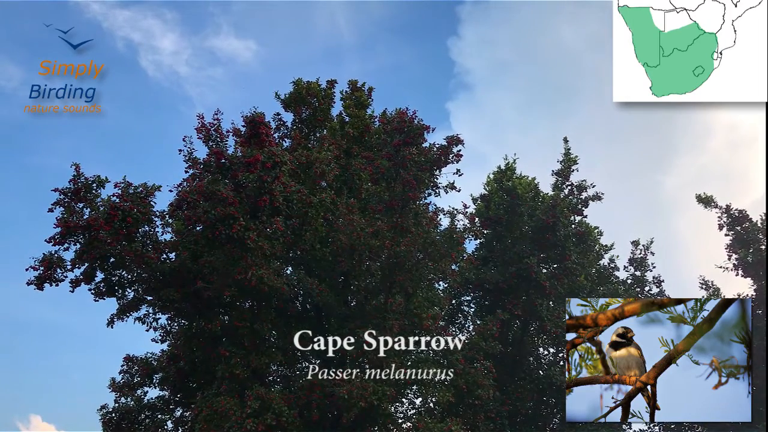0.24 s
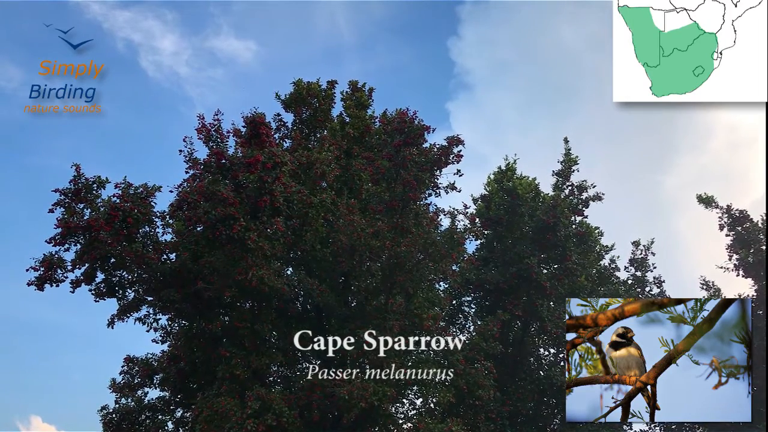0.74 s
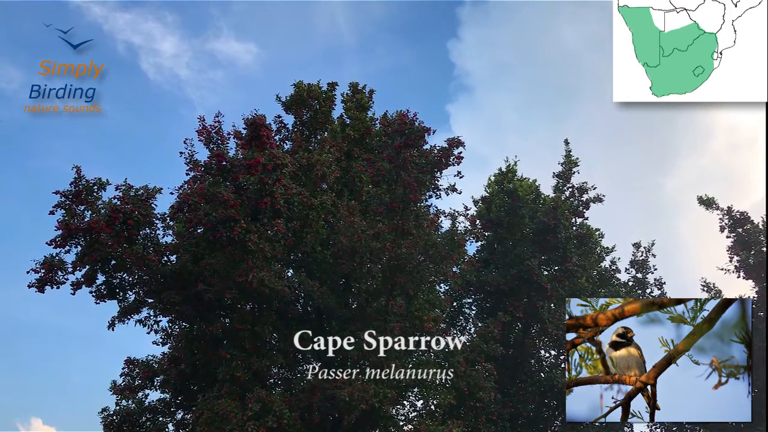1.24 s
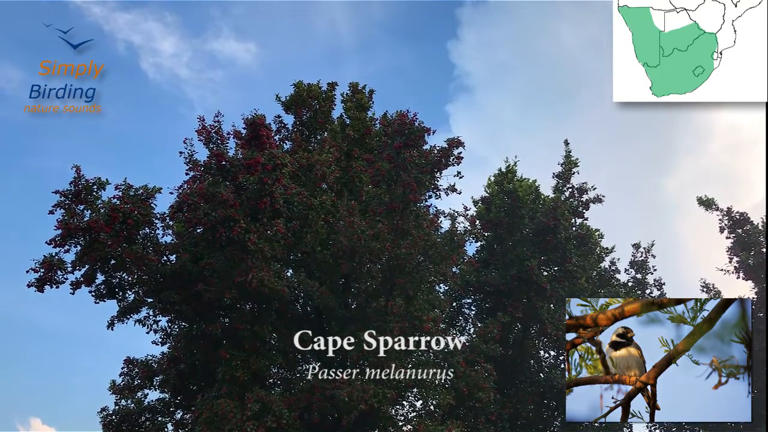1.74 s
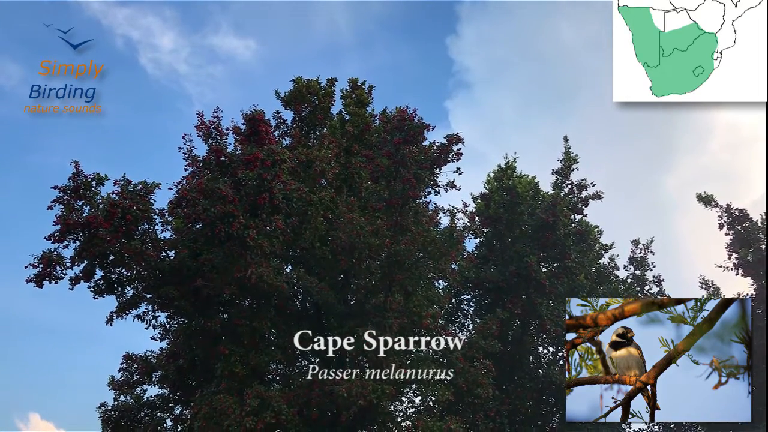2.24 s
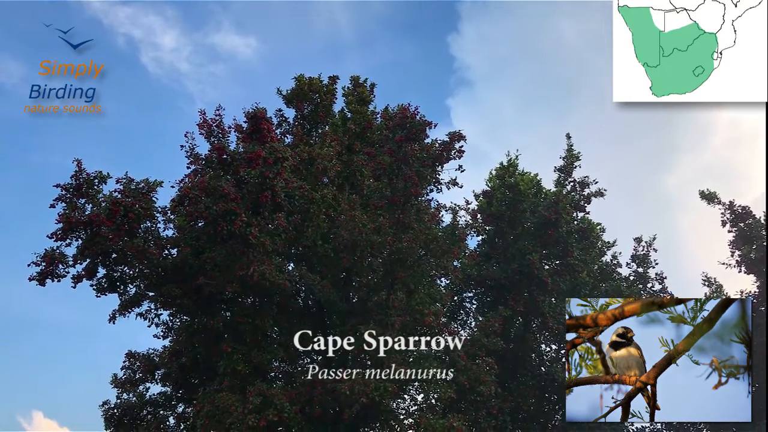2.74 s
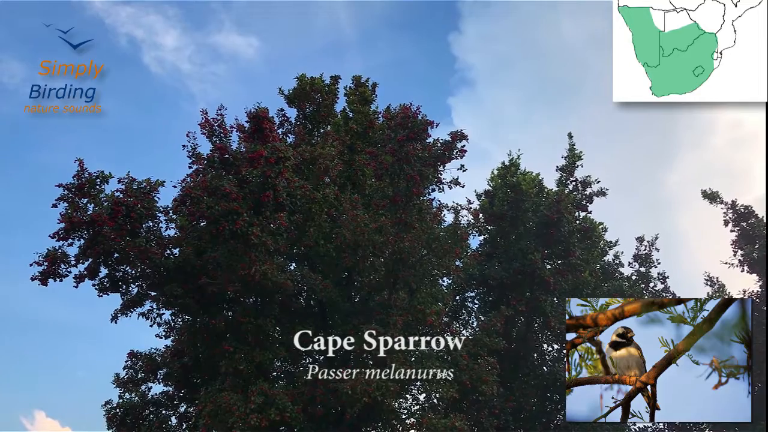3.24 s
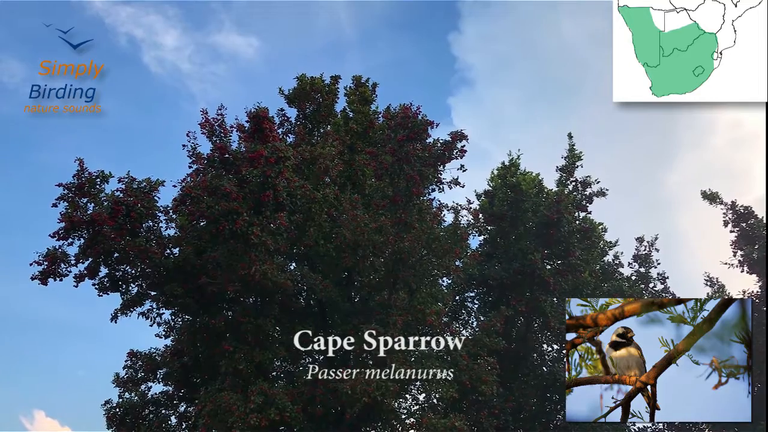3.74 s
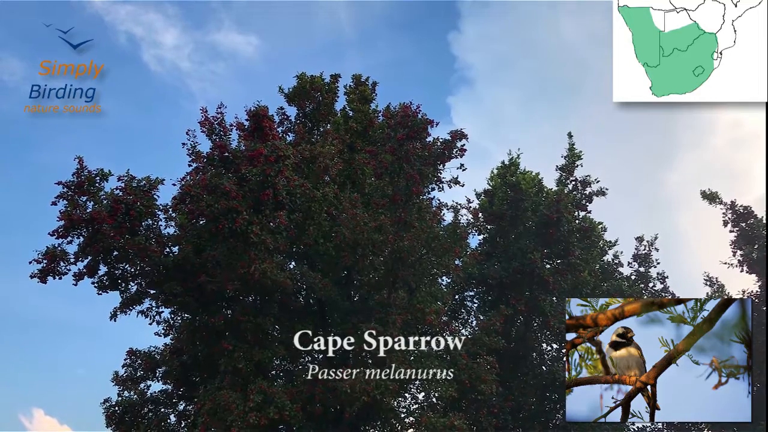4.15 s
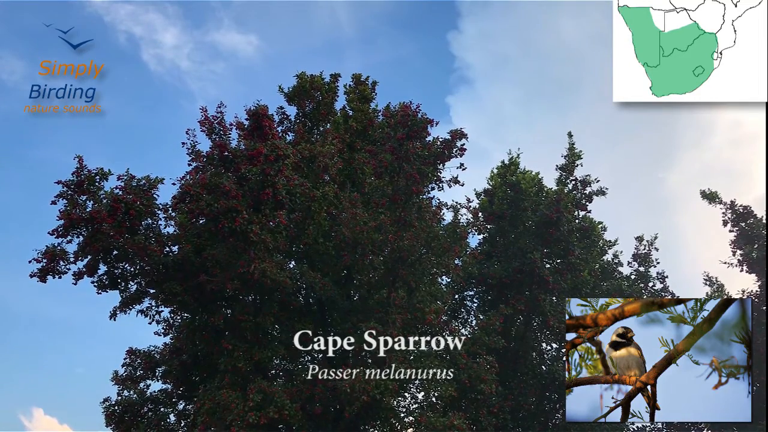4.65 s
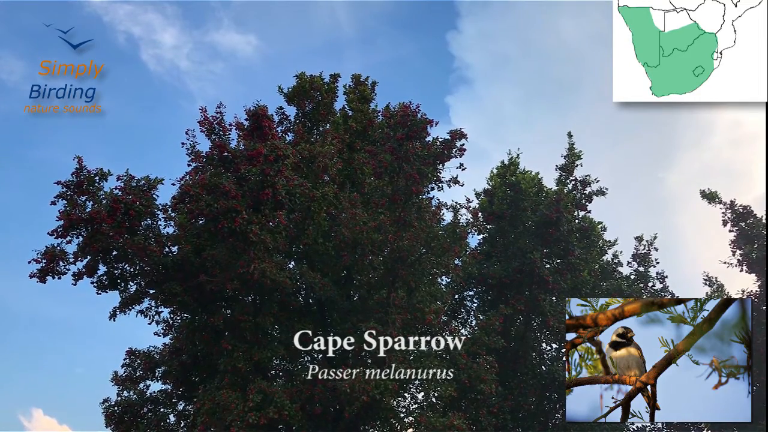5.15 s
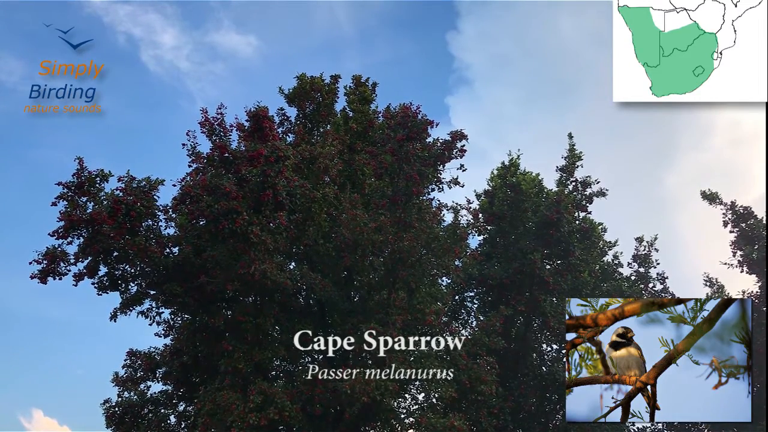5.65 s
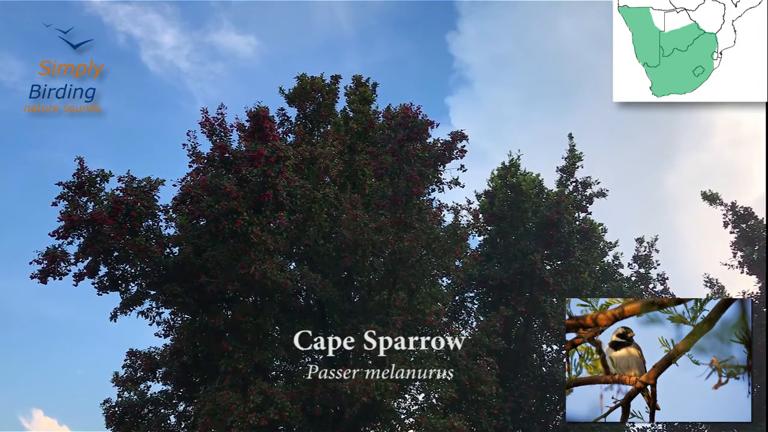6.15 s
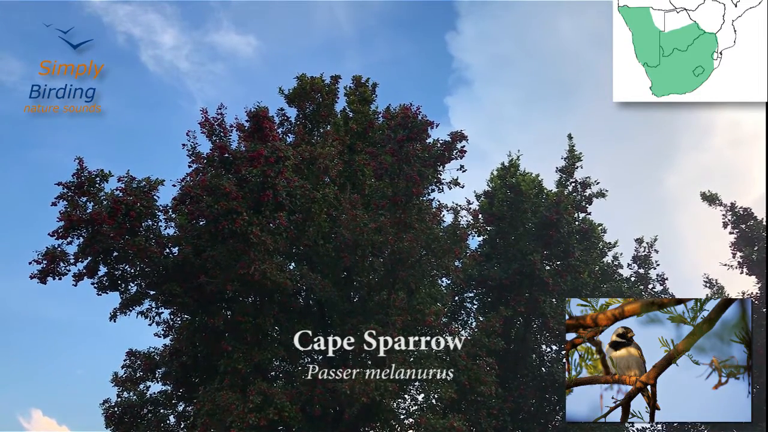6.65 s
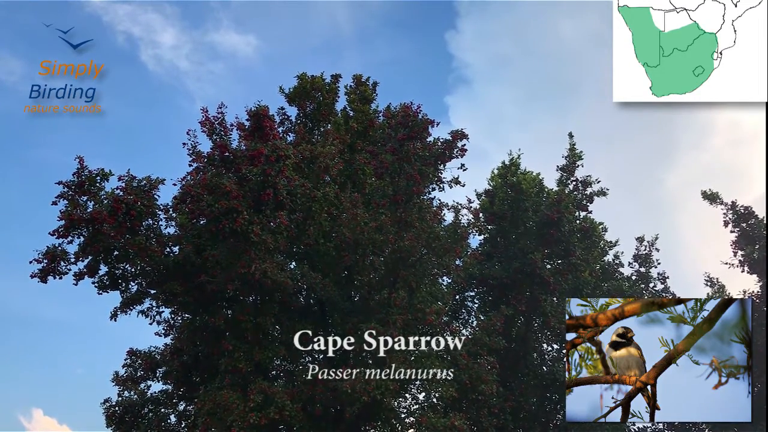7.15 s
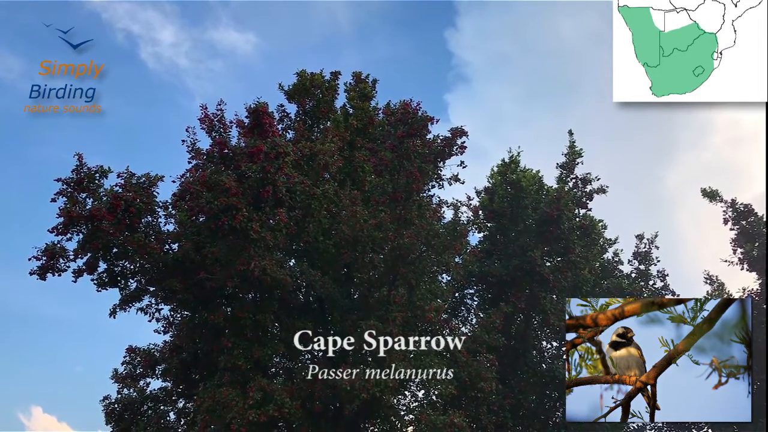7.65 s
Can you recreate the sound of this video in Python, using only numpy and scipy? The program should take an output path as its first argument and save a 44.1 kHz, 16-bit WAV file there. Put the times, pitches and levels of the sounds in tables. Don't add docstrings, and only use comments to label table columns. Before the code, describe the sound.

A small sparrow in a garden tree gives sharp chirps about once a second, wavy and downward-sliding in turn, over faint distant birdsong.

```python
import sys
import numpy as np
from scipy import signal
from scipy.fft import rfft, irfft
from scipy.io import wavfile
from scipy.ndimage import uniform_filter1d

SR = 44100
rng = np.random.default_rng(int(sys.argv[2]) if len(sys.argv) > 2 else 0)


def level_to_linear(level):
    exponent = np.asarray(level, float) / 20
    return 10 ** exponent


def to_wav(s):
    ch = np.atleast_2d(s).T
    pcm = np.round(np.clip(ch, -1, 1) * 32767)
    wavfile.write(sys.argv[1], SR, pcm.astype(np.int16))


N = 348390

# frequency_hz, density_db (per Hz)
HUSH_SPECTRUM = [(20, -11.5), (60, -35.5), (200, -28.5), (400, -21), (700, -13.5), (1000, -6.5),
                 (2000, 1.5), (3200, -3.5), (4000, -6.5), (5000, -10.5), (6300, -9.5), (8000, -14.5),
                 (12000, -16), (16000, -18)]
HUSH_DB = -60.5

# start_s, length_s, first_pitch_hz, last_pitch_hz, level_db
DOVES = [
    (0.239, .08, 423, 428, -84),
    (1.78, .5, 1238, 1066, -78),
    (2.356, .2, 590, 631, -84.5),
    (4.709, .11, 426, 428, -90),
    (5.367, .13, 612, 729.2, -81.5),
    (6.002, .375, 663.6, 773, -75),
    (7.026, .095, 520, 540, -83),
]
# start_s, length_s, first_pitch_hz, last_pitch_hz, level_db
SCOOPS = [
    (1.44, .16, 2150, 2602, -56),
    (1.66, .195, 1750, 2180, -57),
    (1.75, .11, 2100, 1900, -62),
    (2.215, .075, 2600, 3290, -50),
    (2.42, .18, 1550, 2225, -57),
    (2.63, .42, 2200, 2080, -67),
]
# start_s, length_s, first_pitch_hz, last_pitch_hz, level_db
GLIDES = [
    (.507, .043, 5200, 3600, -70),
    (1.734, 0.043, 3850, 3290, -66),
    (2.732, 0.15, 3230, 3560, -67),
    (5.1, 0.031, 2124, 2590, -50.5),
    (6.914, .046, 3800, 3450, -65),
]
# start_s, length_s, first_pitch_hz, last_pitch_hz, level_db
RISER = (2.655, .24, 3500, 5850, -69)
# start_s, length_s, pitch_hz, level_db
PEEPS = [
    (.001, .18, 2375, -69.5),
    (0.224, .095, 3084, -64.5),
    (0.371, .142, 3323, -68.5),
    (0.442, .042, 3600, -71),
    (1.018, .055, 7380, -68.5),
    (1.367, .066, 2163, -64),
    (3.299, .4, 2063, -70.5),
    (5.688, .05, 3370, -66.5),
    (6.54, .11, 2083, -67.5),
    (6.558, .06, 3364, -63),
]
# start_s, length_s, first_pitch_hz, last_pitch_hz, level_db
HOARSE_CALLS = [
    (.001, .073, 4000, 2900, -65.5),
    (.245, .03, 2350, 1750, -58),
    (.286, .025, 2310, 1750, -60),
    (3.304, .153, 2518, 2306, -64.5),
    (4.03, .21, 6050, 5900, -71),
    (4.05, .18, 5250, 5080, -72),
    (4.375, .07, 3700, 3200, -69),
    (4.86, .056, 3700, 3500, -69),
    (5.17, .05, 5100, 5120, -55),
    (7.117, .14, 3250, 3350, -67),
]
# pair_start_s, lower_pitch_hz, level_db, rasp_db, pitch_waver_share
CHIRRUPS = [
    (1.385, 4400, -62, -65, .007),
    (3.08, 4620, -48, -62, .016),
    (3.65, 4620, -57, -63, .018),
    (7.03, 4600, -71, -68, .03),
]
# start_s, length_s, first_pitch_hz, last_pitch_hz, level_db
NEIGHBOUR_CALLS = [
    (7.405, .055, 3330, 2800, -60),
    (7.5, .08, 3020, 2430, -61),
    (7.685, .085, 3020, 2430, -62),
]
# multiple, level_db
NEIGHBOUR_PARTIALS = [(2, 2), (3, -2), (4, -16.5), (5, -15), (6, -21.5)]

# start_s, pitch_factor, stretch_factor, level_db, swell_db (towards the end)
WAVY_CALLS = [
    (0.745, 1, 1.02, 0.2, 0.5),
    (2.9853, 1.007, 0.99, 0.3, 1),
    (5.1016, 1.001, .99, 0.73, 0.16),
    (7.267, 1.012, 1.017, 2.34, -2),
]
# start_s, pitch_factor, stretch_factor, level_db, swell_db (towards the end)
SLIDE_CALLS = [
    (1.8665, 1.014, 0.99, -0.11, 0.15),
    (3.8385, 1.011, 1, 0.22, 0.55),
    (5.9769, 1.015, 0.99, -0.32, -0.35),
    (7.8503, 1.016, 0.94, -0.085, -0.059),
]
# time_s (after the onset), pitch_hz, effort_db
ARCH = [(-.005, 3077, -50), (0, 4020, -36), (.004, 4452, -21), (.012, 4760, -25.5), (.028, 4910, -32),
        (.036, 4740, -27.5), (.045, 3804, -17), (.051, 2952, -32)]
HUMP = [(.06, 3320, -19.5), (.072, 3957, -25), (.085, 4139, -24), (.096, 4050, -30), (.109, 3533, -31)]
TROUGH = [(.116, 3100, -21), (.126, 2433, -19), (.135, 2216, -23), (.144, 2392, -20), (.151, 2850, -25.5),
          (.162, 3150, -40.5), (.167, 3050, -56)]
UNDERTONE = [(.003, 3800, -77.5), (.008, 3756, -44.5), (.016, 3617, -33), (.038, 3335, -28),
             (.042, 3500, -42.5), (.047, 3965, -34.5), (.052, 4170, -26.5), (.055, 4140, -34.5),
             (0.058, 4200, -73.5)]
DIP = [(-.005, 4743, -57), (-.001, 4470, -37.5), (.004, 4000, -25.5), (.008, 2810, -45)]
FLICK = [(.010, 4153, -25), (.014, 6452, -46.5), (.016, 5283, -31.5), (.018, 5040, -24)]
SLIDE = [(.023, 5030, -35), (.03, 4762, -32.5), (.04, 4365, -19.5), (.056, 3800, -18), (.07, 3315, -14),
         (.092, 2530, -18), (.108, 2060, -23.5), (.121, 1814, -38), (.125, 1888, -48)]
# multiple, level_db
OVERTONES = [(2, -35), (3, -42), (4, -52), (5, -55.5)]
# frequency_hz, gain_db
BEAK = [(1500, -19.5), (2200, -7.5), (3500, -6.5), (4450, 13), (4800, 11), (5400, -4), (6200, 3.5),
        (7200, -4.5), (8300, -2), (9300, -3), (11300, 5), (13000, -6), (16000, -7)]
# t60_s, level_db
LEAVES, WALLS = (0.3, -20), (0.62, -22.5)

# start_s, length_s, level_db
KNOCKS = [
    (2.2215, 0.0014, -63),
    (6.89, 0.018, -79),
]
# time_s (after the onset), pitch_hz, effort_db
MATE = [(.001, 4200, -55.5), (.008, 4436, -41), (.02, 4440, -36), (0.032, 4480, -25.5), (.045, 4380, -31.5),
        (.055, 4480, -37), (.065, 4494, -64)]
MATE_START_S = 5.16


def evened(x):
    return x / np.sqrt(np.mean(abs(x) ** 2) + 1e-20)


def read(points, hz):
    f, value = np.transpose(points)
    return np.interp(np.log(hz + 1), np.log(f + 1), value)


def add(mix, start_s, sound):
    part = mix[round(start_s * SR):][:len(sound)]
    part += sound[:len(part)]


def drift(count, span_s):
    size = max(int(span_s * SR), 2)
    noise = uniform_filter1d(rng.standard_normal(count), size)
    return evened(uniform_filter1d(noise, size))


def scatter(x, t60_s, level_db):
    t = np.arange(SR) / SR
    echoes = rng.choice([-1., 1.], SR) * (rng.random(SR) < .08)
    taps = echoes * level_to_linear(-60 * t / t60_s) * (1 - np.exp(-t / 0.0014))
    return level_to_linear(level_db) * signal.fftconvolve(x, taps / np.linalg.norm(taps))


def hush():
    frames, hz = N // 256 + 5, np.fft.rfftfreq(1024, 1 / SR)
    a, b, patches = rng.standard_normal((frames, 513, 3)).T
    patches = uniform_filter1d(patches, size=10, axis=0)
    patches = evened(uniform_filter1d(patches, size=20, axis=1))
    chatter = np.exp(-np.log(hz / 3200 + 1e-9) ** 2 / 1.6)[:, None]
    level_db = read(HUSH_SPECTRUM, hz)[:, None] + (.3 + 1.3 * chatter) * patches
    noise = signal.istft((a + 1j * b) * level_to_linear(level_db), nperseg=1024, noverlap=768)[1]
    return level_to_linear(HUSH_DB) * evened(noise[:N])


def far_call(partials, waver, waver_s, t60_s, wet_db, bend, start_s, length_s, first_hz, last_hz, level_db):
    u = np.linspace(0, 1, int(length_s * SR))
    hz = last_hz + (first_hz - last_hz) * (1 - u) ** bend
    turns = np.cumsum(hz * (1 + waver * drift(len(u), waver_s))) / SR
    tone = np.zeros(len(u))
    for k, partial_db in partials:
        if k * first_hz < SR / 2:
            tone += level_to_linear(partial_db) * np.cos(2 * np.pi * k * turns)
    loudness = np.sqrt(2) * level_to_linear(level_db + 3.5 * drift(len(u), .01))
    direct = loudness * tone * signal.windows.tukey(len(u), .35)
    heard = scatter(direct, t60_s, wet_db)
    add(heard, 0, direct)
    return start_s, heard


def far_chirrup(out, start_s, pitch_hz, level_db, rasp_db, waver):
    pure, rasp_s, pair_s = [(1, 0)], .06, .075
    add(out, *far_call(pure, .09, .001, .25, 3, 1,
                       start_s - .6 * rasp_s, rasp_s, .83 * pitch_hz, pitch_hz, rasp_db))
    for ratio, voice_db in (1, 0), (1.165, -5):
        hz = ratio * pitch_hz
        add(out, *far_call(pure, waver, .002, .5, 2, 1,
                           start_s, pair_s, (1 + waver) * hz, (1 - waver) * hz, level_db + voice_db))


def far_birds():
    out = np.zeros(N)
    # partials, pitch waver share, waver time s, echo t60 s, echo level dB
    clear = [(1, 0.0091)], .0066, .008, .42, -4
    hoarse = [(1, 0)], .025, .0018, .4, 5
    climbing = [(1, 0)], .012, .003, .4, 0
    neighbour = NEIGHBOUR_PARTIALS, .012, .002, .35, 9
    scoop_bend, glide_bend, riser_bend = 6.5, 1.2, 3.5
    for row in PEEPS:
        start_s, length_s, hz, level_db = row
        add(out, *far_call(*clear, 1, start_s, length_s, hz, hz, level_db))
    for row in HOARSE_CALLS:
        add(out, *far_call(*hoarse, glide_bend, *row))
    for row in DOVES + GLIDES:
        add(out, *far_call(*clear, glide_bend, *row))
    for row in CHIRRUPS:
        far_chirrup(out, *row)
    for row in SCOOPS:
        add(out, *far_call(*clear, scoop_bend, *row))
    add(out, *far_call(*climbing, riser_bend, *RISER))
    for row in NEIGHBOUR_CALLS:
        add(out, *far_call(*neighbour, 1.2, *row))
    return out


def swing(t, s, hz):
    step = np.diff(hz) / np.diff(s)
    slope = np.gradient(hz, s) * np.r_[1, step[1:] * step[:-1] > 0, 1]
    place = np.interp(t, s, np.arange(len(s)))
    k = np.minimum(place.astype(int), len(s) - 2)
    u, span = place - k, np.diff(s)[k]
    ease = u * u * (2 * (1 - u) + 1)
    bow = span * u * (1 - u) * ((1 - u) * slope[k] - u * slope[k + 1])
    return hz[k] + (hz[k + 1] - hz[k]) * ease + bow


def membrane(shape, t, pitch, swell_db):
    throat_hz, throat_width_hz, throat_db = 3450, 760, 6.5
    s, hz, db = np.transpose(shape)
    hz = swing(t, s, hz) * pitch * (1 + .002 * drift(len(t), .006))
    db = uniform_filter1d(np.interp(t, s, db, left=-90, right=-90), size=50)
    db = db + throat_db * np.exp(-((hz - throat_hz) / throat_width_hz) ** 2)
    db = db + swell_db * t / .1 + .5 * drift(len(t), .002)
    return np.sqrt(2) * level_to_linear(db) * np.exp(2j * np.pi * np.cumsum(hz) / SR)


def airway(voices):
    cross_db, breath_db = -16.5, -47
    size = sum(abs(v) for v in voices)
    pointer, count = sum(voices) / size, len(size)
    strain = np.minimum(size, 0.11 * (size / .1) ** 0.57)
    extras = np.zeros(count, complex)
    for k, level_db in OVERTONES:
        fade_db = 5 * drift(count, .008) - 2
        extras += level_to_linear(level_db + fade_db) * pointer ** k
    extras += level_to_linear(cross_db) * pointer * (abs(pointer) ** 2 - 1)
    extras = strain * (extras.real + level_to_linear(breath_db) * rng.standard_normal(count))
    beak_gain = level_to_linear(read(BEAK, np.fft.rfftfreq(count, 1 / SR)))
    return irfft(rfft(extras) * beak_gain, count)


def chirp(shapes, start_s, pitch, stretch, level_db, swell_db):
    t = (np.arange(int(.2 * SR)) / SR - .01) / stretch
    voices = [membrane(shape, t, pitch, swell_db) for shape in shapes]
    extras = level_to_linear(level_db) * airway(voices)
    whistle = level_to_linear(level_db) * sum(voices).real
    direct = whistle + extras
    heard = scatter(direct, *LEAVES) + scatter(direct, *WALLS)
    short_waves = signal.sosfilt(signal.butter(3, 5200, "high", fs=SR, output="sos"), whistle)
    heard += scatter(extras, .08, -3.0) + scatter(short_waves, .12, -13)
    add(heard, 0, direct)
    return start_s - .01, heard


def sparrow():
    out = np.zeros(N)
    for row in WAVY_CALLS:
        add(out, *chirp([ARCH + HUMP + TROUGH, UNDERTONE], *row))
    for row in SLIDE_CALLS:
        add(out, *chirp([DIP + FLICK + SLIDE], *row))
    return out


def knocks():
    out = np.zeros(N)
    for start_s, length_s, level_db in KNOCKS:
        add(out, start_s, level_to_linear(level_db) * np.hanning(int(length_s * SR)))
    return out


def mate():
    t = np.arange(int(.08 * SR)) / SR
    direct = membrane(MATE, t, 1.0, 0).real * level_to_linear(-3.0)
    heard = scatter(direct, *LEAVES) + scatter(direct, *WALLS)
    add(heard, 0, direct)
    return MATE_START_S, heard


def scene():
    background = hush() + far_birds()
    near = sparrow()
    thuds = knocks()
    add(near, *mate())
    bass_cut = signal.butter(4, 900, "high", fs=SR, output="sos")
    return (background + thuds + signal.sosfilt(bass_cut, near))[None]


def roll_off(x):
    return signal.sosfilt(signal.butter(12, 15720, fs=SR, output="sos"), x)


def record(dry):
    return roll_off(dry)


dry = scene()
out = record(dry)
to_wav(out)
```